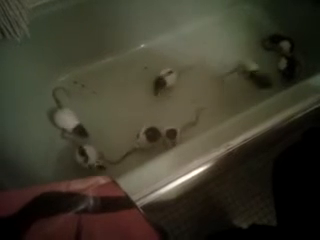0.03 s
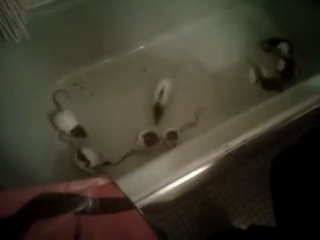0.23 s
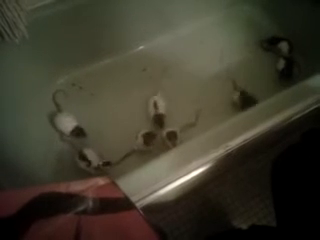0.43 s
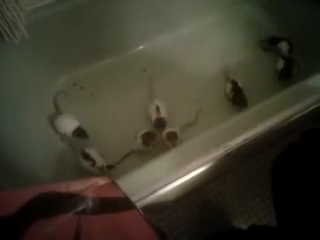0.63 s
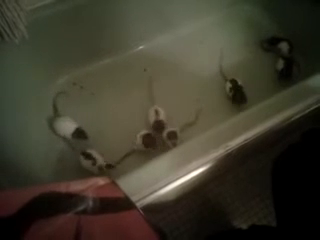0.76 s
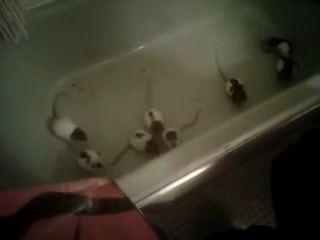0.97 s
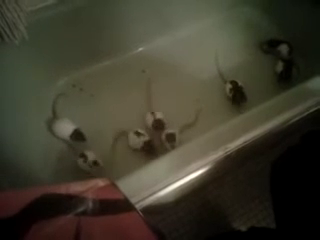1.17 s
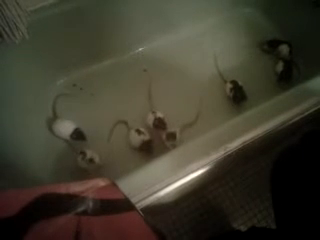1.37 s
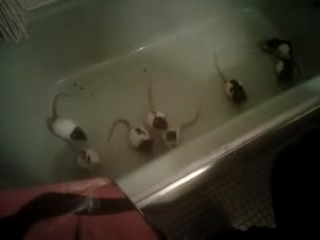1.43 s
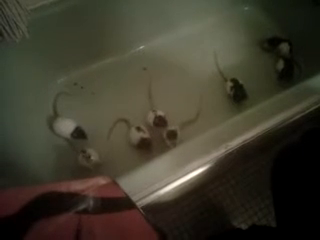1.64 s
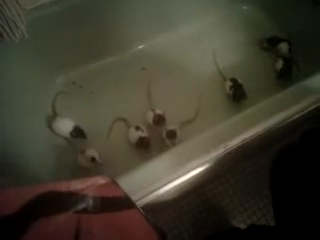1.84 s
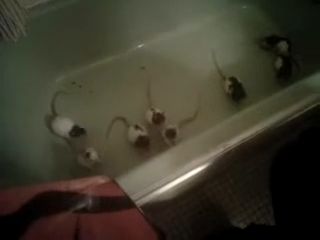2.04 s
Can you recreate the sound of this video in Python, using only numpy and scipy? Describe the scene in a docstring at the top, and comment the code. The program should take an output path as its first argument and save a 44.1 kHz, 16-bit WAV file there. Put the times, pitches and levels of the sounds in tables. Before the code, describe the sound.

Splashing shallow water in a bathtub: a rat lands with a sharp wet slap, droplets and bubbles patter back, a softer second landing follows, then quiet hiss and one dull bump, heard from above in a small bathroom.

```python
"""Rats leap through shallow water in a bathtub, heard from above in a small bathroom.
Shaped-noise hiss and a faint wavering hum run throughout. Two landings, crowds of random slaps
over a low noise thud, set the tub's decaying resonances ringing. Thrown water falls back after each:
clouds of small bubbles and single plinks as rising sine rings, spray as filtered ticks.
Near the end comes one soft bump, a short decaying low sine."""
import sys
import numpy as np
from scipy import signal
from scipy.io import wavfile
from scipy.ndimage import uniform_filter1d

SR = 44100
rng = np.random.default_rng(int(sys.argv[2]) if len(sys.argv) > 2 else 0)


def store_pcm(level_fs):
    """Save levels as 16-bit WAV."""
    pcm = np.round(np.clip(level_fs, -1, 1) * 32767).astype(np.int16)
    wavfile.write(sys.argv[1], SR, np.atleast_2d(pcm).T)


N = 92610
BUBBLE_GLIDE_PER_S = 2.5  # pitch rise as a fraction of the starting pitch


def amp(db):
    """Decibels to gain."""
    return 10 ** (np.asarray(db) / 20)


def evened(x):
    """Scales to rms 1."""
    return x / np.sqrt(np.mean(x ** 2) + 1e-20)


def sized(x, like):
    """Scales x to the rms of another signal."""
    return evened(x) * np.sqrt(np.mean(like ** 2))


def read(points, hz):
    """Interpolates a table on a log-frequency axis."""
    f, value = np.transpose(points)
    return np.interp(np.log(hz + 1), np.log(f + 1), value)


def add(mix, start_s, sound):
    """Mixes a sound in at a time, in place."""
    part = mix[round(start_s * SR):][:len(sound)]
    part += sound[:len(part)]


def colour(x, points, size=4096):
    """Causal minimum-phase filter with the given spectrum."""
    hz = abs(np.fft.fftfreq(size, 1 / SR))
    log_gain = np.log(amp(np.maximum(read(points, hz), -100)))
    spectrum = np.exp(np.conj(signal.hilbert(log_gain)))
    taps = np.fft.ifft(spectrum).real
    return signal.fftconvolve(x, taps[:size // 2])[:len(x)]


def swell(start_s, rise_s, decay_s, db):
    """Envelope: sine-squared rise to its top, then exponential decay."""
    t = np.arange(N) / SR - start_s
    rise = np.sin(np.pi / 2 * np.clip(t / rise_s, 0, 1)) ** 2
    decay = np.exp(-np.maximum(t - rise_s, 0) / decay_s)
    return amp(db) * rise * decay


def patter(per_s, db_per_size):
    """Random impacts of uneven size and either sign."""
    hit = rng.random(N) < per_s / SR
    size = np.minimum(rng.exponential(1, N), 3)
    sign = rng.choice([-1, 1], N)
    return hit * amp(db_per_size * size) * sign


def bubble(hz, decay_s, attack_s):
    """A trapped bubble rings, rising in pitch as it nears the surface."""
    t = np.arange(0, 7 * decay_s, 1 / SR)
    ring = (1 - np.exp(-t / attack_s)) ** 2 * np.exp(-t / decay_s)
    phase = 2 * np.pi * hz * (t + BUBBLE_GLIDE_PER_S * t ** 2 / 2)
    return ring / ring.max() * np.sin(phase)


def slow_drift():
    """Twice-smoothed noise of rms 1."""
    smooth = uniform_filter1d(rng.standard_normal(N), size=3000)
    return evened(uniform_filter1d(smooth, size=2000))


def background():
    """Steady shaped-noise hiss and faint hum tones, wavering in level and phase."""
    # hiss spectrum, relative: f/Hz, density/dB per Hz
    hiss_spectrum = [(20, 3.5), (40, -7), (70, -6), (110, -14.5), (180, -9.5), (300, -11), (450, -13.5),
                     (700, -17.5), (1200, -20), (2500, -24.5), (5000, -26.5), (7200, -29)]
    # hum tones: f/Hz, rms level/dB
    hum_tones = [(64.6, -74.5), (129.2, -77), (258.4, -73), (393, -79.5)]
    hiss_db, hum_waver = -63, 0.5
    t = np.arange(N) / SR
    out = amp(hiss_db) * evened(colour(rng.standard_normal(N), hiss_spectrum))
    for hz, db in hum_tones:
        waver = 1 + hum_waver * (slow_drift() + 1j * slow_drift())
        out += amp(db) * evened((waver * np.exp(2j * np.pi * hz * t)).real)
    return out


def bump():
    """One soft, dull knock close to the microphone: a decaying low sine."""
    start_s, db, hz, decay_s = 1.7132, -39, 245, 0.0018
    out, t = np.zeros(N), np.arange(SR // 10) / SR
    add(out, start_s, -amp(db) * np.exp(-t / decay_s) * np.sin(2 * np.pi * hz * t))
    return out


def spray():
    """Fine droplets tick on the water and the tub wall."""
    # bursts of spray: t/s, rise/s, decay/s, level before mix/dB
    bursts = [(0.366, 0.0043, 0.04, -44.5), (0.41, 0.0039, 0.025, -43.5), (0.466, 0.0033, 0.024, -47.5),
              (0.72, 0.015, 0.099, -53), (0.833, 0.0031, 0.021, -42), (.9, 0.013, 0.01, -54)]
    # tick spectrum, relative: f/Hz, density/dB per Hz
    tick_spectrum = [(200, -20.5), (1000, -14.5), (2500, -3.5), (3900, -7), (4500, -5), (6000, -5),
                     (7400, -17)]
    drops_per_s, db_per_size = 1400, -0.5
    out = np.zeros(N)
    for row in bursts:
        level = swell(*row)
        ticks = level * patter(drops_per_s, db_per_size)
        out += sized(colour(ticks, tick_spectrum), level)
    return out


def plinks():
    """Larger drops each leave one clear bubble."""
    # single bubbles: t/s, peak before mix/dB, starting f/Hz, decay/s
    drops = [(0.3619, -28, 1590, 0.0051), (0.3854, -37, 1504, 0.006), (.413, -35.5, 1424, 0.0051),
             (0.469, -40.5, 3100, 0.0032), (0.498, -37, 2887, .005), (0.518, -49.5, 2616, 0.022),
             (0.647, -40, 476, 0.0041), (.711, -33.5, 1946, 0.0025), (.735, -36, 2884, 0.0037),
             (0.821, -43.5, 1516, 0.018), (.8952, -38, 1501, 0.0057), (.908, -37.5, 2188, .002),
             (.915, -33, 2250, 0.0014), (0.928, -41.5, 1607, 0.0038)]
    attack_cycles = 4
    out = np.zeros(N)
    for start_s, db, hz, decay_s in drops:
        add(out, start_s, amp(db) * bubble(hz, decay_s, attack_cycles / hz))
    return out


def cloud(start_s, rise_s, decay_s, db, hz, octaves, count=16):
    """Falling water traps many short bubbles of about one size."""
    bubbles_per_s, db_per_size = 1000, 0.5
    decay_cycles, attack_cycles = 5, 0.6
    level, out = swell(start_s, rise_s, decay_s, db), np.zeros(N)
    place = (np.arange(count) + rng.random(count)) / count  # one draw per slot of 0..1
    pitches_hz = hz * 2 ** (octaves * 2 * np.arcsin(2 * place - 1))
    for pitch_hz in pitches_hz:
        grain = bubble(pitch_hz, decay_cycles / pitch_hz, attack_cycles / pitch_hz)
        starts = level * patter(bubbles_per_s / count, db_per_size)
        out += signal.oaconvolve(starts, grain)[:N]
    return sized(out, level)


def clouds():
    """Thrown water falls back in a run of bubble clouds."""
    # clouds: t/s, rise/s, decay/s, level before mix/dB, centre f/Hz, pitch scatter scale/octaves
    cloud_rows = [(0.346, 0.013, 0.046, -37, 1653, 0.11), (0.342, 0.019, 0.025, -34.5, 2750, 0.13),
                  (0.386, 0.0047, 0.043, -51.5, 1228, 0.067), (0.405, 0.0081, 0.055, -43.5, 1770, 0.3),
                  (.489, 0.011, 0.02, -45, 2630, 0.12), (.59, 0.017, 0.016, -58.5, 3190, 0.21),
                  (0.623, 0.017, 0.016, -41, 480.7, 0.25), (.666, 0.024, 0.021, -50.5, 545, 0.18),
                  (.705, 0.018, 0.034, -41.5, 2418, 0.24), (0.741, 0.01, 0.012, -46, 1042, 0.28),
                  (.763, .014, 0.042, -44, 1670, 0.22), (0.787, 0.034, .014, -53, 1170, 0.1),
                  (0.902, 0.012, 0.014, -46.5, 2250, 0.24), (1.028, 0.012, 0.01, -60.5, 3680, 0.034),
                  (1.46, 0.049, 0.037, -71.5, 2220, 0.23)]
    return sum(cloud(*row) for row in cloud_rows)


def thuds():
    """The weight of each landing rumbles in the tub floor as low noise."""
    # thuds: t/s, rise/s, decay/s, level before mix/dB
    thud_rows = [(0.237, 0.015, 0.028, -46), (.624, 0.019, 0.046, -49)]
    # thud spectrum, relative: f/Hz, density/dB per Hz
    thud_spectrum = [(40, -25.5), (100, -10.5), (160, -10), (200, 2), (245, -10.5), (300, -4), (450, -17),
                     (1000, -44)]
    out = np.zeros(N)
    for row in thud_rows:
        level = swell(*row)
        out += sized(colour(level * rng.standard_normal(N), thud_spectrum), level)
    return out


def landings():
    """A body hits the water in a crowd of small slaps."""
    # landings: t/s, rise/s, decay/s, level before mix/dB, tilt/dB per octave
    landing_rows = [(0.224, 0.032, 0.021, -27, 1.5), (0.619, 0.014, 0.032, -42, 1)]
    # slap spectrum before tilt, relative: f/Hz, density/dB per Hz
    slap_spectrum = [(60, -49.5), (190, -15.5), (450, -8), (750, -6.5), (950, -1), (1550, -1.5), (2100, -8),
                     (2900, -5.5), (4000, -24), (5600, -23), (7400, -45.5)]
    slaps_per_s, db_per_size, tilt_pivot_hz = 3800, 3, 1400
    out = np.zeros(N)
    for start_s, rise_s, decay_s, db, tilt_db in landing_rows:
        level = swell(start_s, rise_s, decay_s, db)
        tilted = [(hz, band_db + tilt_db * np.log2(hz / tilt_pivot_hz)) for hz, band_db in slap_spectrum]
        slaps = level * patter(slaps_per_s, db_per_size)
        out += sized(colour(slaps, tilted), level)
    return out


def bathroom(x, slot=16):
    """Dense reflections from the tub and the walls, each band dying at its own speed."""
    # reverberation: f/Hz, t60/s
    room_t60 = [(100, 0.84), (600, 0.35), (1500, 0.34), (3000, 0.27), (7000, 0.52)]
    delay_s = 0.004
    at = np.arange(0, SR - slot, slot)
    taps, out = np.zeros(SR), np.zeros(N)
    taps[at + rng.integers(0, slot, len(at))] = rng.choice([-1, 1], len(at))
    hz, t, bands = signal.stft(taps, SR, nperseg=256)
    decay = np.exp(-np.log(1000) * t / read(room_t60, hz)[:, None])
    tail = signal.istft(bands * decay, SR)[1]
    add(out, delay_s, signal.fftconvolve(x, tail / np.linalg.norm(tail)))
    return out


def tub(x):
    """The tub and the air in it ring at their own pitches under every splash."""
    # resonances: f/Hz, gain relative to tub_db/dB, t60/s
    resonances = [(199.7, 8.5, 0.53), (572.5, 4, 0.25), (606, 2.5, 0.24), (874, 1.5, 0.38), (899, 5, 0.23),
                  (975, 1.5, 0.23), (1179, 3, 0.29), (1238, -7, 0.13), (1454, -3, 0.16), (1534, 0, 0.19),
                  (1680, 0, 0.27), (1724, -4, 0.19), (1894, 3.5, 0.41), (2253, -1.5, .2),
                  (2493, -2.5, 0.22), (2793, 1.5, 0.23)]
    tub_db = 1.5
    t = np.arange(SR) / SR
    ring = np.zeros(SR)
    for hz, db, t60_s in resonances:
        rate = np.log(1000) / t60_s
        unit_gain = 2 * rate / SR  # about 0 dB at resonance
        ring += amp(tub_db + db) * unit_gain * np.exp(-rate * t) * np.cos(2 * np.pi * hz * t)
    return signal.fftconvolve(x, ring)[:N]


def scene():
    """The splashing in its tub and room, over the background; the bump stays dry."""
    direct_db, plink_send_db, room_db = -0.5, -3, -3.5
    water = spray() + clouds() + thuds() + landings()
    drops = plinks()
    sent = water + amp(plink_send_db) * drops
    direct = amp(direct_db) * (water + drops)
    reflected = tub(sent) + amp(room_db) * bathroom(sent)
    return (background() + bump() + direct + reflected)[None]


def record(dry):
    """A narrow-band recorder cuts off the top: linear-phase low-pass."""
    edge_hz = 7300
    taps = signal.firwin(401, edge_hz, window=("kaiser", 8), fs=SR)
    return signal.oaconvolve(dry, taps[None], "same")


dry = scene()
out = record(dry)
store_pcm(out)
```